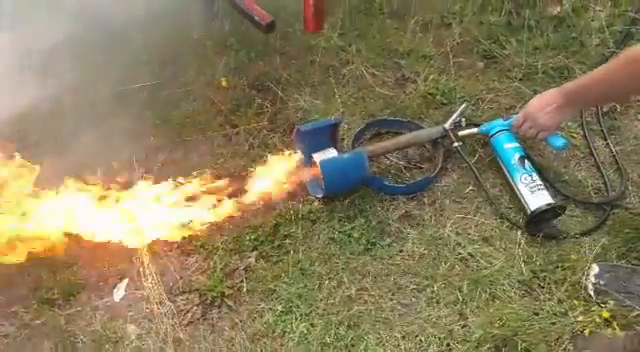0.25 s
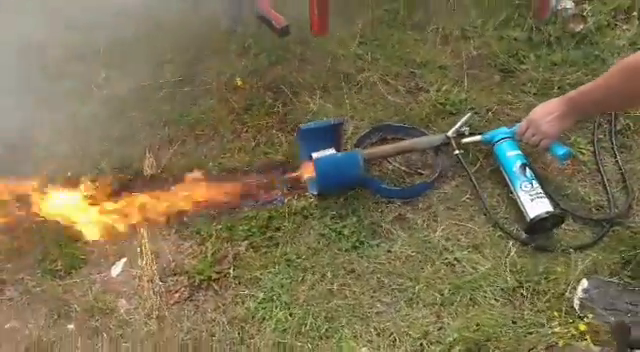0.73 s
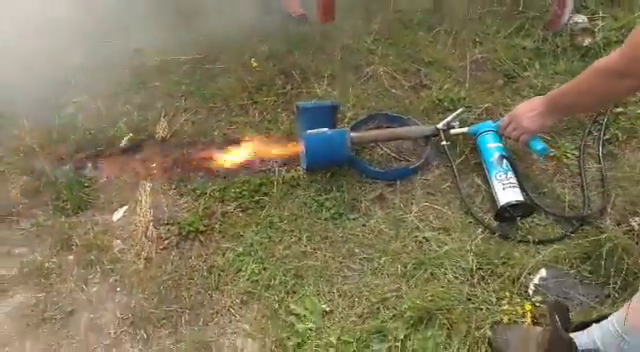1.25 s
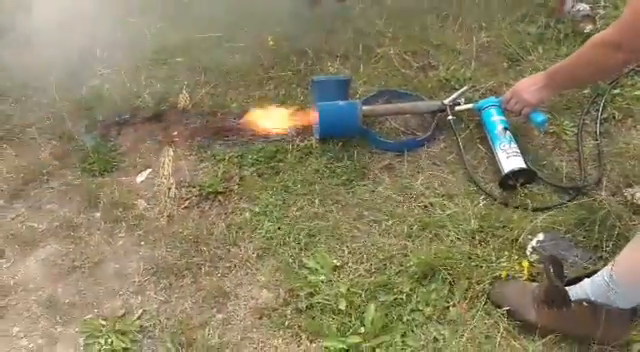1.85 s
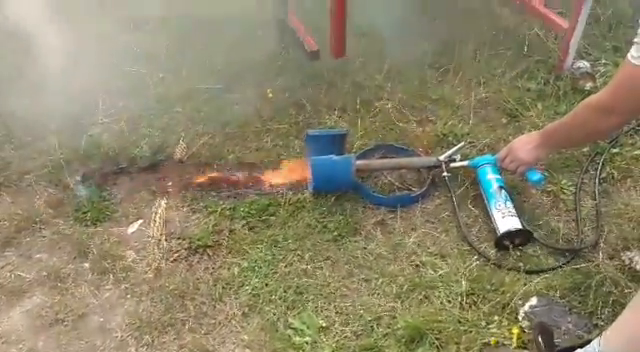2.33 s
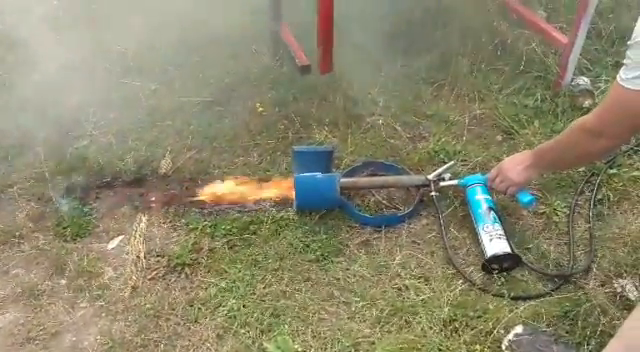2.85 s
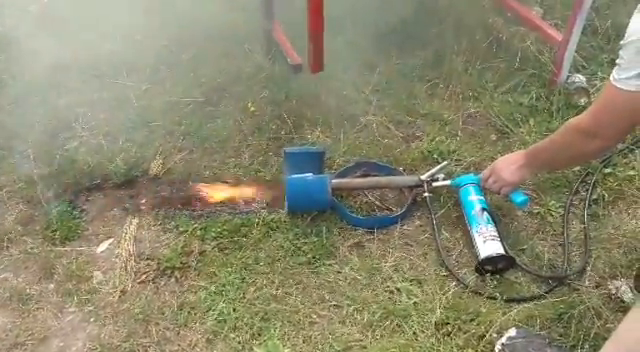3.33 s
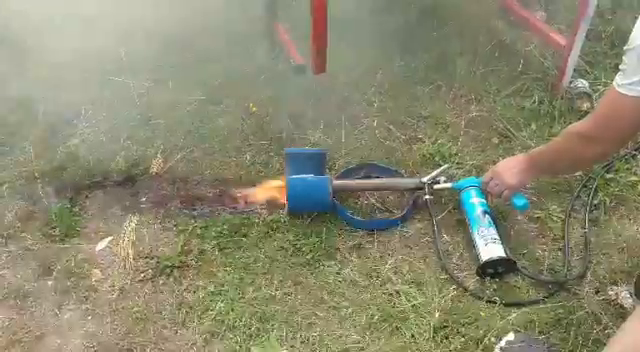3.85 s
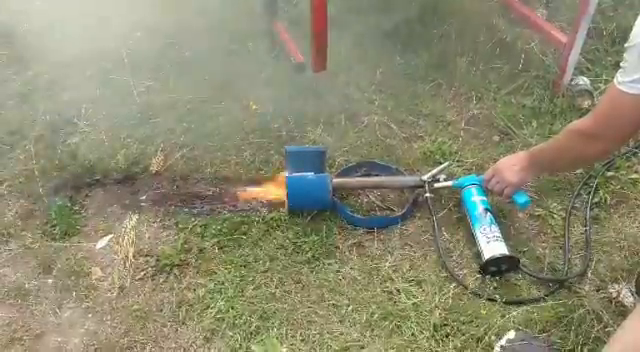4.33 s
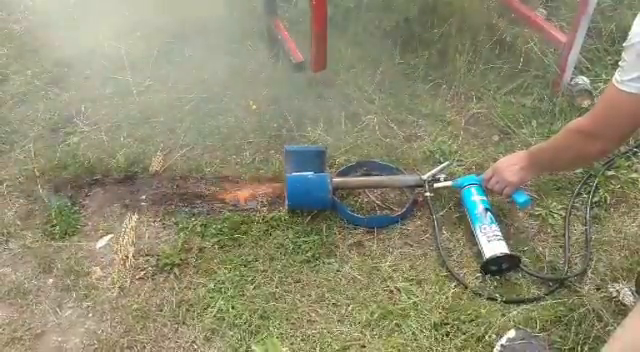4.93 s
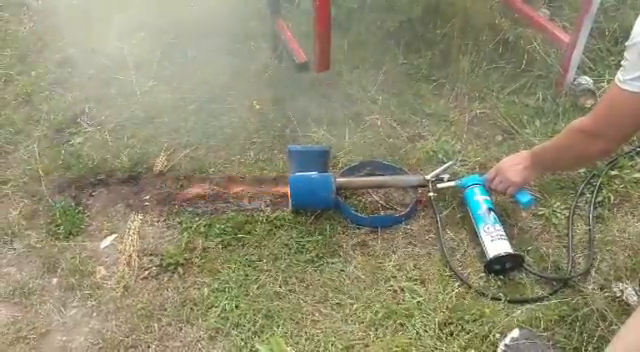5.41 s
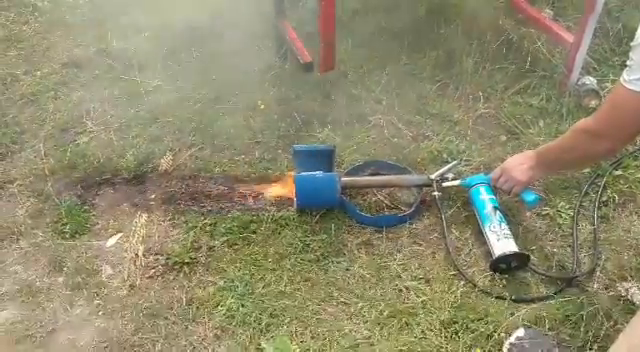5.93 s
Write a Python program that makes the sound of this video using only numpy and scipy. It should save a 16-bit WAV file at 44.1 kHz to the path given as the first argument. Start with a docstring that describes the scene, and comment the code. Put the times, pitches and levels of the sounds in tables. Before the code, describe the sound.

Outdoors, a step from the microphone, an air-fed oil burner roars without pause. Its metal can gives a hollow, rough hoot around 950 hertz, fluttering fast with compressor strokes. Deep billowing rumble swells in the first second, then shrinks away, leaving a drier sputtering roar. Dozens of irregular barking flares and spits overload the microphone, while air hisses and a faint buzz sits beneath.

```python
"""Oil burner roaring close by

An air-atomised oil burner fires along the grass, a step away. Noise and tiny random pops make its turbulent roar,
which sets the can hooting; each compressor stroke makes it flutter. Pockets of mist flare up as short rings
and puffs, the hardest overloading the microphone; short noise bursts spit alone or roughen the hardest flares.
The air jet hisses as filtered noise, the compressor buzzes faintly in sines, and a wall sends back one echo."""
import sys
import numpy as np
from scipy import signal
from scipy.fft import rfft, irfft, next_fast_len
from scipy.io import wavfile
from scipy.ndimage import uniform_filter1d, minimum_filter1d, map_coordinates

SR = 44100
rng = np.random.default_rng(int(sys.argv[2]) if len(sys.argv) > 2 else 0)


def bounce(signal):
    """Save signal as a 16-bit WAV file at the path given by the first command-line argument."""
    frames = np.transpose(np.atleast_2d(signal))
    limited = np.clip(frames, -1, 1)
    pcm = np.round(limited * 32767).astype(np.int16)
    wavfile.write(sys.argv[1], SR, pcm)


N = 272097
TIME = np.arange(N) / SR
STROKE_HZ = 47.45   # rate of the air compressor


def flame(throb_db, flicker_db, flicker_hz):
    """One uneven burning rate drives the hoot of the can, the open roar and the rumble of the plume."""
    # how hard the flame drives the can: t/s, hoot before trim/dB
    hoot_drive = [(0.0, -17), (0.8, -15), (1.05, -11.5), (1.5, -12), (2.08, -12.5), (2.27, -8), (2.55, -12),
                  (2.85, -11.5), (3.12, -8), (3.6, -11.5), (3.9, -10), (4.25, -12), (4.8, -13), (5.05, -10),
                  (5.5, -12.5), (6.15, -7.5)]
    # air resonance, moving with the heat of the gas and broadening as the flame draws in: t/s, f/Hz, width/Hz
    can_pitch = [(0.0, 968, 36.3), (0.75, 967.5, 36), (0.92, 935.4, 103), (1.37, 924, 107.4),
                 (2.65, 928.7, 103), (3.0, 927.5, 103), (4.2, 938.7, 98.5), (6.15, 956.7, 81)]
    # the burning falters for a moment: t/s, level change/dB, time to 1/e/s
    falters = [(0.457, -4, 0.04), (1.343, -4, 0.047), (2.066, -1.5, 0.027), (3.505, -2, 0.064),
               (3.662, -5.5, 0.02), (4.207, -3, 0.058), (5.307, -5, 0.021), (5.943, -4.5, 0.068)]
    # noise colour of the burning that feeds the can: f/Hz, density/dB
    feed = [(300, -38), (520, -3.5), (700, 1), (850, 3.5), (950, -1.5), (1100, 4), (1300, -12.5),
            (2000, -19)]
    # noise colour of the open roar: f/Hz, density/dB
    roar_colour = [(250, -47), (450, -8), (700, -1), (1100, 7.5), (1350, 0.5), (1550, -1), (1800, -0.5),
                   (2100, -21), (2400, -19), (3000, -69)]
    # noise colour of the bright edge: f/Hz, density/dB
    edge_colour = [(1500, -36), (1800, -11), (2050, -3), (2220, 7), (2450, -38), (3000, -69)]
    # noise colour of the plume's rumble, before its pops flicker: f/Hz, gain/dB
    rumble_colour = [(30, -44), (60, -47.5), (110, -12.5), (160, 0), (210, 1.5), (300, 2.5), (370, -2),
                     (500, -3.5), (800, -2.5), (1500, -55)]
    # noise colour of the deep billowing: f/Hz, density/dB
    billow_colour = [(20, -37), (40, -20), (65, -18), (90, 3.5), (120, 4), (165, 4), (240, -19), (600, -85)]
    # noise colour of a flare's open puff, below and above the can's note: f/Hz, density/dB
    puff_colour = [(50, -52), (110, -18.5), (220, -2), (450, -10), (700, 7), (950, 2), (1250, 4.5),
                   (1800, -3), (2350, -27), (3000, -65)]
    hoot_trim_db, puff_db = -1.93, -18.5
    roar_start_db, roar_follows, roar_sink_db_per_s = -21, 0.3, 0.3
    shake = 0.35   # exponent on the can's swing

    (hoot_db,), (can_hz, can_width_hz) = in_time(hoot_drive), in_time(can_pitch)
    # the roar follows the hoot's swing in part and sinks as the flame shrinks
    roar_db = roar_start_db + roar_follows * (hoot_db - hoot_db.mean()) - roar_sink_db_per_s * TIME
    rumble_db, billow_db, edge_db = plume_levels()
    falter = from_db(sum(db * bump(s, half_s) for s, db, half_s in falters))
    burning_db = throb_db * strokes(0) + flicker_db * drift(flicker_hz)
    inside, outside = (pops(per_s=1800, fizz=0.23) * from_db(burning_db) for place in range(2))

    # the burning rate also pumps the ring that is already in the can
    ringing = resonate(colour(inside, feed), can_hz, can_width_hz)
    ringing = steady(ringing * from_db(0.13 * burning_db))
    hoot = from_db(hoot_db + hoot_trim_db) * ringing

    # a strong ring shakes the open flame and makes it roar harder
    outside = outside * uniform_filter1d(swing_of(ringing), size=SR // 300) ** shake
    roar = from_db(roar_db) * steady(colour(outside, roar_colour))
    roar = roar + from_db(edge_db) * rms_one(colour(outside, edge_colour))

    # the large plume has its own pops and follows the burning a little less
    plume_pops = pops(per_s=600, fizz=0.35) * from_db(0.87 * burning_db)
    rumble = from_db(rumble_db) * rms_one(colour(plume_pops, rumble_colour))
    billow = from_db(billow_db) * rms_one(colour(white(), billow_colour))

    ring, surge, prior = flares(can_hz, detune_hz=35.6, prior_s=0.003, lead_s=0.0035)
    # a flare takes over the fuel of the steady flame while it lasts
    turbulence = (1 - surge) * saturate(hoot * prior + roar * prior ** 0.59, top=0.65)
    puffs = from_db(puff_db) * surge * rms_one(colour(white(), puff_colour))
    return falter * (turbulence + rumble + billow) + ring + puffs


def flares(can_hz, detune_hz, prior_s, lead_s):
    """Mist flares after a brief dip or rise of the fire; gives ring, surge and prior level change."""
    # pockets of mist: t of peak/s, peak level/dB, half length/s, level change just before/dB
    mist_pockets = [(0.0965, -5.5, 0.004, 2), (0.138, 3.5, 0.0013, -8), (0.148, -7.5, 0.0046, 12),
                    (0.2, -7, 0.0036, -8), (0.246, -3.5, 0.0029, -9), (0.326, -1.5, 0.0011, 0),
                    (0.3463, 4, 0.0028, 8), (0.363, -7.5, 0.0021, -3.5), (0.4127, -7, 0.0043, -6),
                    (0.513, -9, 0.0083, 4), (0.556, -6.5, 0.0037, 0), (0.6843, -3.5, 0.0019, -11),
                    (0.9457, 1.5, 0.00091, -7), (0.953, -2.5, 0.003, -8), (0.977, -2.5, 0.0011, 0.5),
                    (1.004, -3.5, 0.0072, -14), (1.02, -2, 0.0033, -3), (1.04, -2, 0.0027, -6),
                    (1.1479, -4, 0.0012, -1), (1.208, -4.5, 0.0026, -11), (1.237, -2.5, 0.0053, 6),
                    (1.3163, 4, 0.0039, -17), (1.398, -3.5, 0.004, -4), (1.4623, -3, 0.004, -8),
                    (1.485, -1.5, 0.0041, -4), (1.568, -4, 0.0036, 5), (1.577, -5.5, 0.0029, -21),
                    (1.612, 0, 0.0015, -2), (1.634, -4, 0.003, 5), (1.813, -5.5, 0.0035, -12),
                    (1.896, -3, 0.0035, -8), (1.9177, 0, 0.0017, 3), (2.0534, 3, 0.0012, -2),
                    (2.113, -4, 0.0019, -14), (2.159, 3, 0.00075, 2), (2.2026, -1.5, 0.0054, -11),
                    (2.2335, -5, 0.0055, 5), (2.257, 0.3, 0.005, -13), (2.339, -4, 0.0036, -4),
                    (2.348, -1.5, 0.0011, -1), (2.369, 2.5, 0.00084, 6), (2.416, -9, 0.0049, -5),
                    (2.456, -3.5, 0.0058, -17), (2.4686, -4, 0.003, -2), (2.5363, -3, 0.0025, -10),
                    (2.621, 3, 0.00067, 1), (2.666, -3.5, 0.0022, -22), (2.684, -5, 0.0048, -2),
                    (2.768, -0.5, 0.002, -18), (2.833, -5.5, 0.0026, -4), (2.895, -2.5, 0.0051, -2),
                    (2.938, -3, 0.0057, -3.5), (2.96, -8, 0.0068, -13), (2.987, -2, 0.0039, -4),
                    (3.0464, -12.5, 0.0021, -9), (3.084, 0, 0.0038, -15), (3.098, 1, 0.0036, 8),
                    (3.122, -3, 0.005, 0), (3.133, -4, 0.0035, -3), (3.153, -2, 0.0021, -6),
                    (3.195, 3.5, 0.0023, -4), (3.234, -5, 0.0029, 1), (3.304, -2.5, 0.003, -16),
                    (3.3305, 0, 0.0029, -15), (3.3594, 3.5, 0.0043, -19), (3.3775, -1.5, 0.003, -8.5),
                    (3.391, -1, 0.003, 0.5), (3.4047, 4, 0.0021, -9), (3.486, -1.5, 0.0028, -14),
                    (3.5113, -5, 0.0023, -18), (3.5276, 1, 0.0041, 10), (3.5722, -2.5, 0.0022, -15),
                    (3.596, -2.5, 0.0041, 3), (3.6107, -0.5, 0.0015, -5), (3.782, 1.5, 0.0015, -9),
                    (3.824, 2, 0.0026, -6.5), (3.8665, 0, 0.003, -4), (3.888, -5, 0.0036, -17),
                    (3.929, -4.5, 0.0034, -29), (3.953, -1, 0.004, -13.5), (4.011, -6.5, 0.0047, -16),
                    (4.1188, 5, 0.0015, 9), (4.138, -6, 0.0053, 4), (4.202, -5.5, 0.0037, -3),
                    (4.349, -3, 0.004, -19), (4.4554, -3, 0.0034, 2.5), (4.476, -2, 0.0017, -17),
                    (4.6283, -0.5, 0.001, 3), (4.6523, -3.5, 0.0034, -7), (4.6675, -2.5, 0.0021, -15.5),
                    (4.7283, -6.5, 0.0053, -11), (4.84, -2, 0.0026, -2), (4.8805, -4, 0.0037, 10),
                    (4.9653, -1.5, 0.005, -4.5), (5.008, -2, 0.003, 16), (5.028, -14.5, 0.004, 8),
                    (5.0713, 5.5, 0.0027, 4.5), (5.201, -4, 0.0029, -20), (5.237, 0.5, 0.0022, 4.5),
                    (5.282, -0.5, 0.0036, -8), (5.3665, -1, 0.0031, 7), (5.3833, -3, 0.0026, -10),
                    (5.425, -6, 0.0032, 0), (5.491, -2.5, 0.0028, -20.5), (5.5096, -3, 0.0015, -6),
                    (5.534, -6.5, 0.0042, 5), (5.59, 1.5, 0.0049, 2.5), (5.6855, 1, 0.002, -1.5),
                    (5.748, -2.5, 0.0055, 3), (5.822, 1.5, 0.0046, 3), (5.833, 4.5, 0.0045, -3),
                    (6.066, -7.5, 0.0026, 11), (6.109, -3.5, 0.0039, -7)]
    rise, tail = 0.9, 1.35   # swells faster than it rings out: shares of the half length
    sag_hz = 64              # starts this far above its final pitch

    ring, surge, change_db = np.zeros((3, N))
    draws = rng.uniform(-0.998, 1, (len(mist_pockets), 2))
    for (s, db, half_s, prior_db), (turn, detune) in zip(mist_pockets, draws):
        span = slice(int(s * SR) - SR // 20, int(s * SR) + SR // 20)
        since = TIME[span] - s
        swell = np.exp(-(since / half_s / np.where(since > 0, tail, rise)) ** 2)
        hz = can_hz[span] + detune_hz * detune + sag_hz * (1 - np.tanh(since / half_s)) / 2
        ring[span] += from_db(db) * swell * np.sin(np.pi * turn + 2 * np.pi * np.cumsum(hz) / SR)
        surge[span] += swell
        before = since + rise * half_s + lead_s
        change_db[span] += prior_db * np.exp(-(before / prior_s) ** 2)
    return ring, np.minimum(surge, 1), from_db(change_db)


def plume_levels():
    """A long plume rumbles, billows and has a bright edge, fading as it shrinks; gives the levels in dB."""
    # the plume rolls up in a soft whoomp: t/s, rumble change/dB, billow change/dB
    whoomps = [(.23, -3.5, 10), (.77, -4, 12), (.98, 1, 2), (1.92, 3, 2.5)]
    shrink_s, whoomp_s = 0.88, 0.096   # both: time to 1/e
    length = np.exp(-TIME / shrink_s)
    # level of the short flame, plus what full length adds
    rumble_db = -30 + 6 * length
    billow_db = -54 + 13 * length
    edge_db = -53.5 + 18.5 * length
    for s, rumble_rise_db, billow_rise_db in whoomps:
        swell = bump(s, whoomp_s)
        rumble_db = rumble_db + rumble_rise_db * swell
        billow_db = billow_db + billow_rise_db * swell
    return rumble_db, billow_db, edge_db


def pops(per_s, fizz):
    """Droplets and eddies burn in tiny pressure pops, at random, over a smooth rush."""
    clicks = (rng.random(N) < per_s / SR) * rng.choice([-1, 1], N)
    return rms_one(clicks) + fizz * white()


def saturate(x, top):
    """The swing of the gas cannot grow past a ceiling."""
    return x / (1 + (swing_of(x) / top) ** 6) ** (1 / 6)


def spits():
    """Short, broad noise bursts: some alone, some roughening the hardest flares."""
    # bursts: t/s, envelope peak/dB
    burst_peaks = [(0.09, -13.5), (0.2456, -15), (0.5163, -18), (0.5546, -19), (1.316, -11.5),
                   (1.6524, -14), (1.9296, -11), (2.156, -13), (2.4123, -17.5), (3.4073, -13.5),
                   (3.6792, -13.5), (3.7828, -15), (4.628, -11), (4.882, -12.5), (5.0705, -9.5),
                   (5.621, -17)]
    # noise colour of a burst: f/Hz, density/dB
    spit_colour = [(60, -48.5), (130, -19), (220, -3), (450, -7), (900, 3.5), (1400, 5.5), (1900, -3),
                   (2500, -37), (3300, -17.5), (4400, -14.5), (5500, -31), (10000, -48)]
    half_s = 0.0024   # time to 1/e
    envelope = sum(from_db(db) * bump(s, half_s) for s, db in burst_peaks)
    return envelope * rms_one(colour(white(), spit_colour))


def upper_ring(shaking, half_width_hz, throb_db):
    """A breathy narrow band of the can sputters with the strokes and with each burst of the flame."""
    # higher ring of the can: t/s, f/Hz, level/dB
    ring_path = [(0, 3400, -38), (.5, 3430, -32.5), (.75, 3407, -42.5), (1.4, 3233, -40.5),
                 (2.0, 3280, -39.5), (2.3, 3290, -36), (2.45, 3270, -51), (2.6, 3250, -37.5),
                 (2.72, 3244, -54), (3.15, 3160, -37), (3.5, 3310, -56)]
    sputter = 1.25   # exponent on the flame's shaking
    hz, db = in_time(ring_path)
    phase = 2 * np.pi * np.cumsum(hz) / SR
    band = drift(half_width_hz) * np.cos(phase) + drift(half_width_hz) * np.sin(phase)
    throb = from_db(throb_db * strokes(-0.0025))
    return from_db(db) * steady(band * shaking ** sputter * throb)


def air_jet(shaking, throb_db):
    """Atomising air hisses, differently at each port; it throbs with the compressor and flutters with the flame."""
    # flow of the jet: t/s, hiss before trim/dB
    jet_flow = [(0.0, -31), (0.2, -35.5), (0.65, -36), (1.05, -34), (1.6, -36), (1.9, -34), (2.45, -39),
                (3.15, -36.5), (3.5, -37), (4.65, -35.5), (5.25, -37), (5.9, -38), (6.15, -38)]
    # slow change of the hiss's colour: t/s, frequency ratio, share of the opposed hiss added to the common hiss
    hiss_shift = [(0, 0.972, 0.087), (1.2, 0.985, 0.09), (2.2, 0.97, 0.1), (3.2, 1, 0.054),
                  (4.5, 1.025, 0.13), (6.15, 0.98, 0.14)]
    # hiss common to both ports: f/Hz, density before the shift/dB
    hiss_mid = [(1000, -19.5), (2100, 2.5), (2450, -20), (2750, -13), (3200, 0.5), (3700, 2), (4450, -0.5),
                (5100, -16.5), (6100, -7.5), (7400, -15.5), (7800, -21), (8700, -14), (11000, -23),
                (13000, -33), (14500, -38.5)]
    # hiss opposed between the ports: f/Hz, density before the shift/dB
    hiss_side = [(1000, -29), (1700, -10), (2200, 4.5), (2800, 4), (3350, -5), (3850, -4.5), (4600, -5.5),
                 (5900, -5.5), (6500, -22.5), (7400, -9), (9300, -20.5), (10900, -17.5), (11800, -31),
                 (15000, -36)]
    trim_db, jet_shake = 2.5, 0.22   # jet_shake: exponent on the flame's shaking

    (hiss_db,), (ratio, side_share) = in_time(jet_flow), in_time(hiss_shift)
    # reading the noise faster or slower shifts its colour
    mid, side = (map_coordinates(colour(white(), shape), [np.cumsum(ratio)], order=3, mode="mirror")
                 for shape in (hiss_mid, hiss_side))
    ports = mid + side_share * side + side * np.array([[1], [-1]])
    hiss = from_db(hiss_db + trim_db) * ports / np.std(mid)
    # the finest hiss flickers on its own
    fine = np.array([colour(x, [(5000, -36), (8000, 1.0)]) for x in hiss])
    coarse = (hiss - fine) * from_db(throb_db * strokes(-0.0012) + 1.2 * drift(73))
    fine = fine * from_db(0.76 * strokes(-0.0056) + 1.1 * drift(13))
    return (coarse + fine) * rms_one(shaking ** jet_shake)


def compressor(waver):
    """Faint overtones of the stroke rate, their phases each wavering a little (radians)."""
    # steady overtones: multiple of the stroke rate, rms level/dB
    overtones = [(2, -52), (3, -48), (31, -43), (37, -56), (40, -55), (61, -60), (62, -59), (63, -58),
                 (72, -53), (74, -54), (79, -55)]
    out = np.zeros((2, N))
    for multiple, db in overtones:
        phase = 2 * np.pi * multiple * STROKE_HZ * TIME + waver * drift(1.8)
        out += from_db(db) * np.sqrt(2) * np.sin(phase + rng.uniform(0, np.pi, (2, 1)))
    return out


def strokes(lag_s):
    """The swing of air pressure with each stroke of the compressor."""
    first_peak_s = 0.0092
    return np.cos(2 * np.pi * STROKE_HZ * (TIME - first_peak_s - lag_s))


def resonate(x, hz, width_hz):
    """A resonance whose centre and width move, stepped block by block; gain about 1 on top."""
    r = np.exp(-np.pi * width_hz / SR)
    out, state, size = np.zeros(N), np.zeros(2), 2 ** 9
    for i in range(0, N, size):
        poles = [1, -2 * r[i] * np.cos(2 * np.pi * hz[i] / SR), r[i] ** 2]
        out[i:i + size], state = signal.lfilter([1, 0, -1], poles, x[i:i + size] + 1e-18, zi=state)
    return out * (1 - r * r) / 2


def colour(x, spectrum, turn=1):
    """Filter by a table of f/Hz, gain/dB; turn = 1j shifts by a quarter cycle."""
    size = next_fast_len(N + SR // 10)
    hz, db = np.transpose(spectrum)
    bins_hz = np.arange(size // 2 + 1) * SR / size
    gain = from_db(np.interp(np.log(bins_hz + 1e-9), np.log(hz), db))
    return irfft(rfft(x, size) * gain * turn, size)[:N]


def white():
    """Plain noise of spread 1."""
    return rng.standard_normal(N)


def drift(rate_hz):
    """Random wander up to a given rate, rms 1."""
    lowpass = signal.butter(2, rate_hz, fs=SR, output="sos")
    slow = signal.sosfilt(lowpass, rng.standard_normal(N + SR))
    return rms_one(slow[SR:])   # drop the filter's start-up


def steady(x):
    """Hold the level at 1 over a fourteenth of a second; faster flicker stays."""
    return x / np.sqrt(uniform_filter1d(x ** 2, size=SR // 14) + 1e-12)


def swing_of(x):
    """The momentary amplitude of an oscillation."""
    return np.abs(signal.hilbert(x, next_fast_len(N))[:N])


def bump(s, half_s):
    """A smooth swell of height 1 around a moment, down to 1/e at half_s either side."""
    return np.exp(-np.minimum(((TIME - s) / half_s) ** 2, 50))


def in_time(rows):
    """Each column of a curve at every sample."""
    s, *columns = np.transpose(rows)
    return [np.interp(TIME, s, c) for c in columns]


def from_db(db):
    """Decibels to amplitude."""
    return 10 ** (np.asarray(db) / 20)


def rms_one(x):
    """Scale to an rms of 1."""
    return x / np.sqrt(np.mean(x ** 2) + 1e-20)


def scene():
    """The fire and its echo reach two close microphone ports, together with the jet and the compressor."""
    # the fire at the two ports, side a quarter cycle from mid: f/Hz, side minus mid/dB
    port_spread = [(30, -6), (90, 4), (170, -3.5), (300, -9.5), (500, -12.5), (950, -19), (1500, -45),
                   (2500, 0)]
    # balance of the ports: f/Hz, left minus right/dB
    tilt = [(60, 5), (130, 1), (300, -1), (1000, -1.1), (2200, -1), (3400, -3.5), (4400, -3), (5500, -1.5),
            (7500, 1.5), (12000, 0.5)]
    echo_s, echo_db = 0.01365, -12.5

    fire = flame(throb_db=1.5, flicker_db=1.34, flicker_hz=61) + spits()
    shaking = steady(uniform_filter1d(swing_of(fire), size=SR // 200))
    high_ring = upper_ring(shaking, half_width_hz=82, throb_db=2.0)
    fire = fire + from_db(echo_db) * np.interp(TIME - echo_s, TIME, fire, left=0)
    at_ports = fire + colour(fire, port_spread, turn=1j) * np.array([[1], [-1]])
    jet = air_jet(shaking, throb_db=0.67)
    left, right = at_ports + high_ring + jet + compressor(waver=0.5)
    half_tilt = np.array(tilt) * [1, 0.5]
    return np.array([colour(left, half_tilt), colour(right, half_tilt * [1, -1])])


def record(dry):
    """A fast limiter of limited range holds the flares at full scale; the hardest overload it. The top is cut."""
    range_db, cutoff_hz = 3.3, 15300
    needed = 1 / np.clip(np.abs(dry).max(axis=0), 1, from_db(range_db))
    gain = uniform_filter1d(minimum_filter1d(needed, size=SR // 500), size=SR // 500)
    lowpass = signal.cheby1(12, 0.1, cutoff_hz, fs=SR, output="sos")
    return signal.sosfilt(lowpass, np.clip(dry * gain, -1, 1))


dry = scene()
out = record(dry)
bounce(out)
```